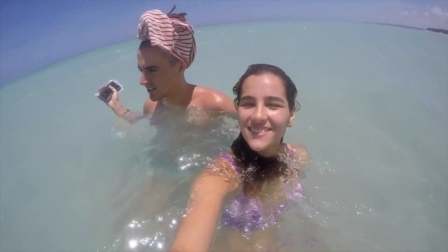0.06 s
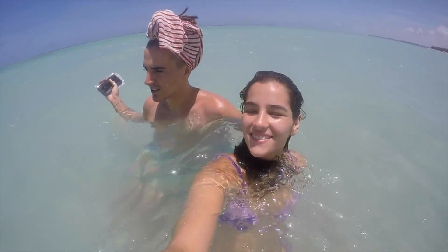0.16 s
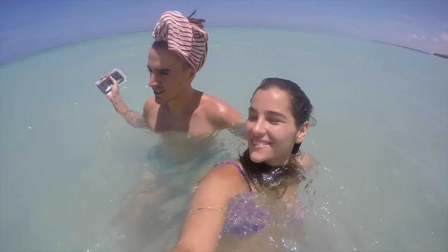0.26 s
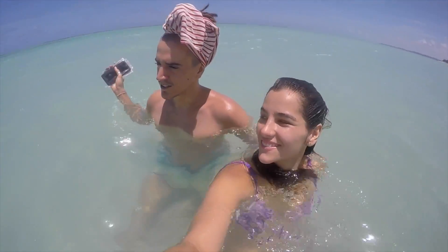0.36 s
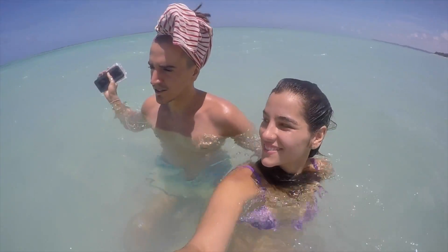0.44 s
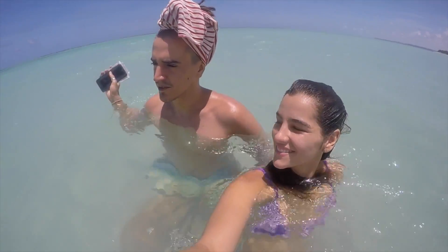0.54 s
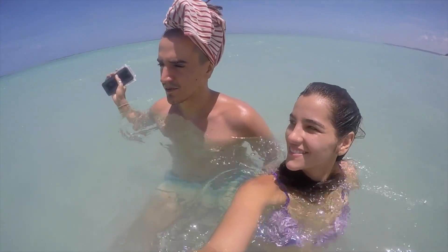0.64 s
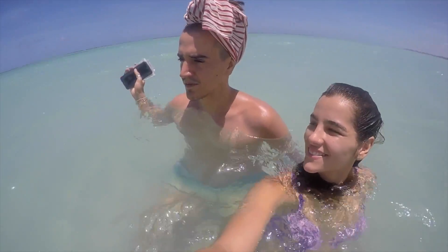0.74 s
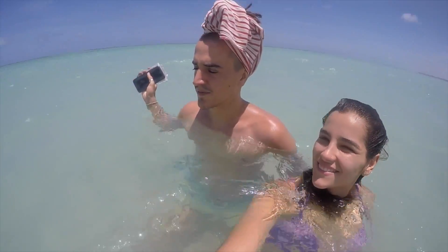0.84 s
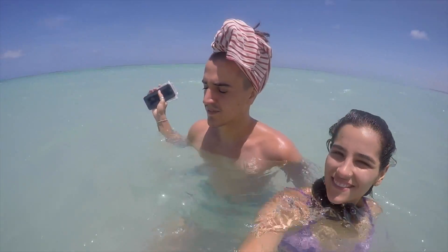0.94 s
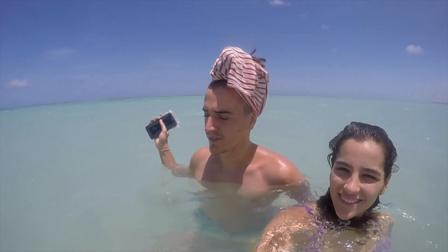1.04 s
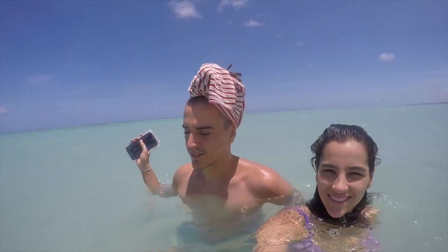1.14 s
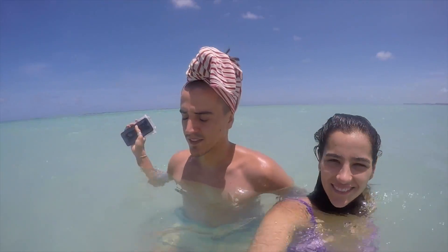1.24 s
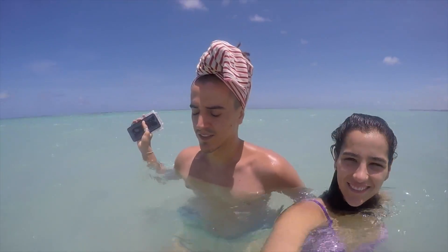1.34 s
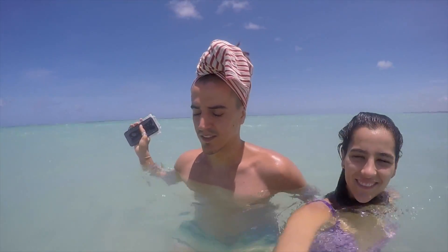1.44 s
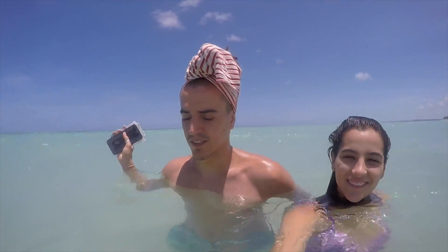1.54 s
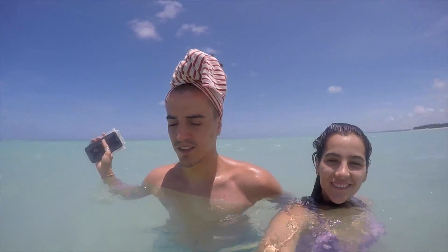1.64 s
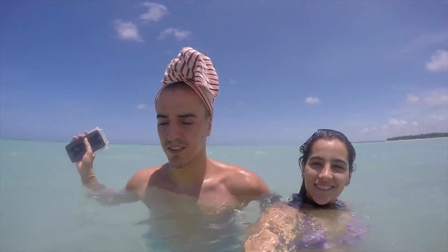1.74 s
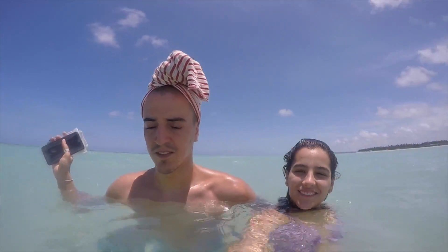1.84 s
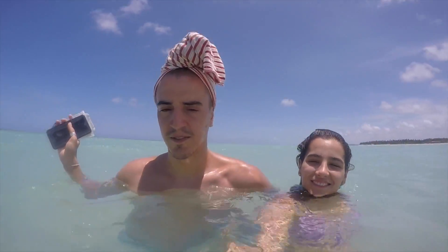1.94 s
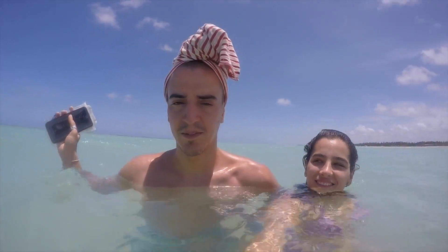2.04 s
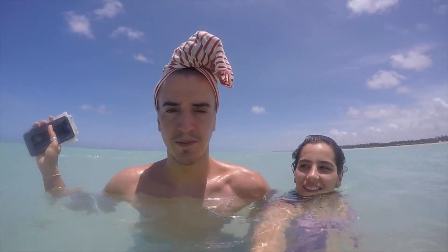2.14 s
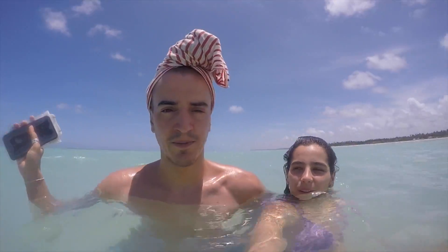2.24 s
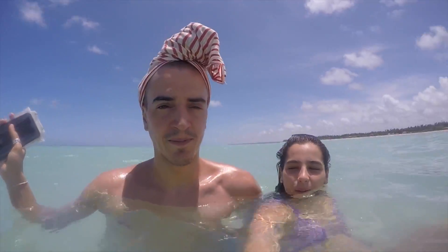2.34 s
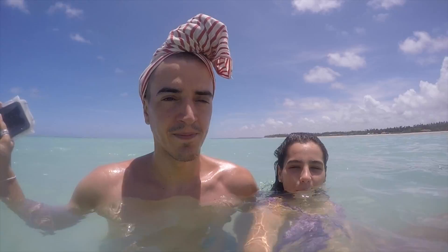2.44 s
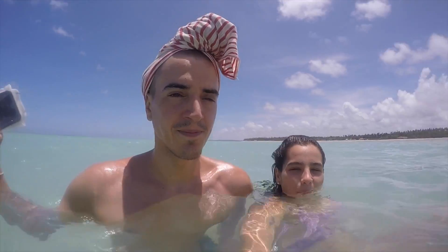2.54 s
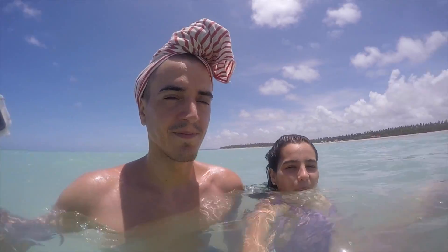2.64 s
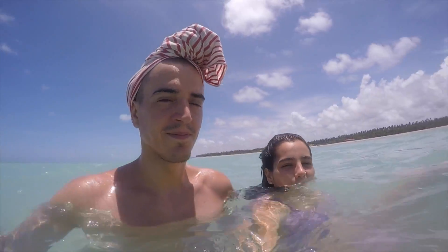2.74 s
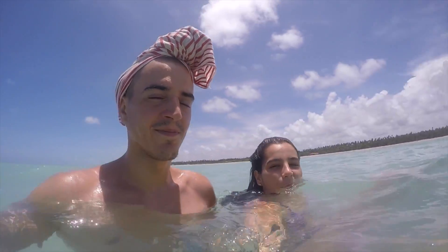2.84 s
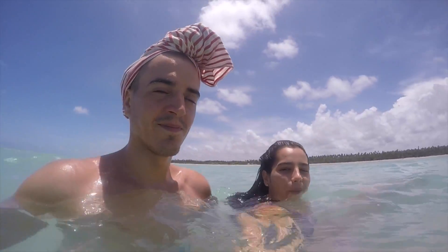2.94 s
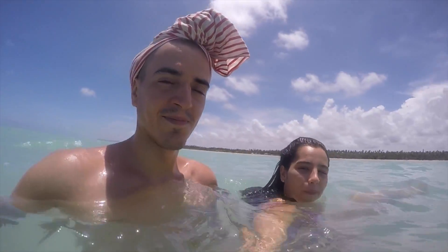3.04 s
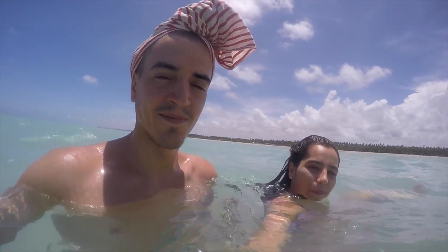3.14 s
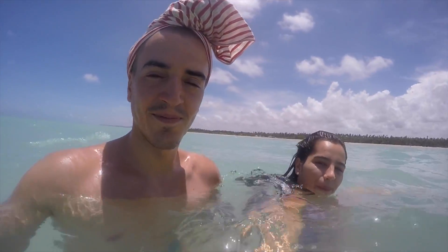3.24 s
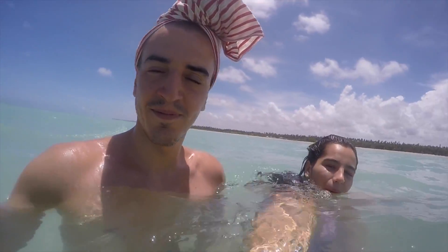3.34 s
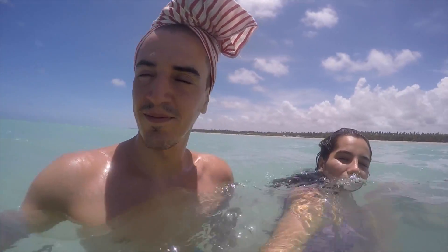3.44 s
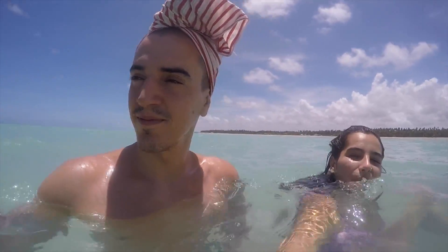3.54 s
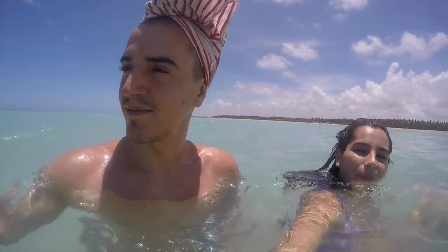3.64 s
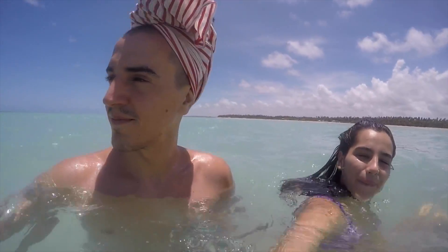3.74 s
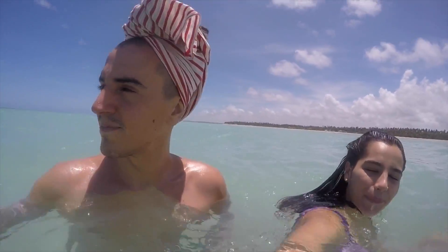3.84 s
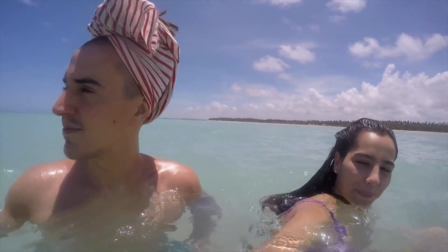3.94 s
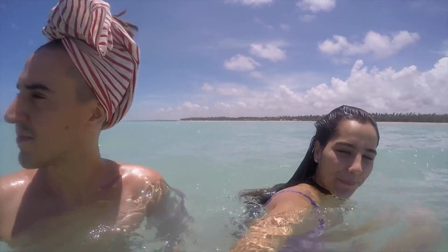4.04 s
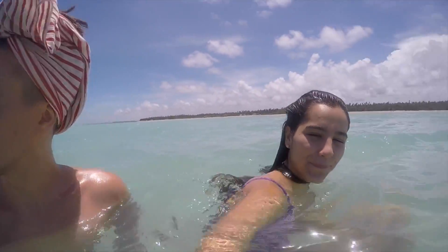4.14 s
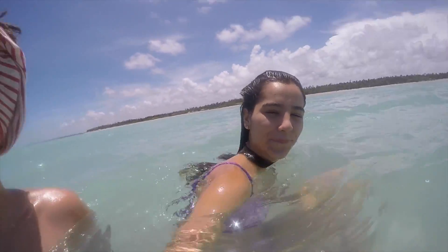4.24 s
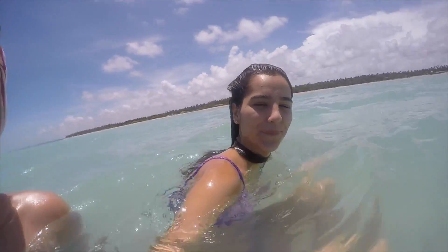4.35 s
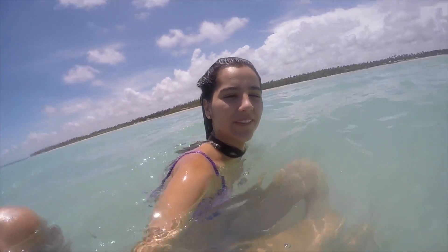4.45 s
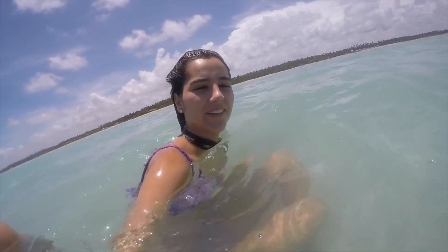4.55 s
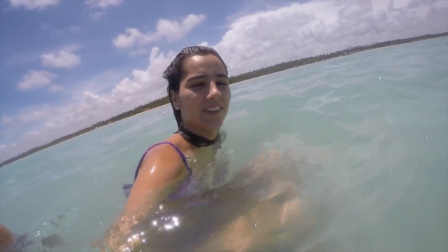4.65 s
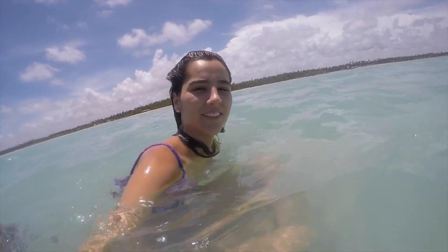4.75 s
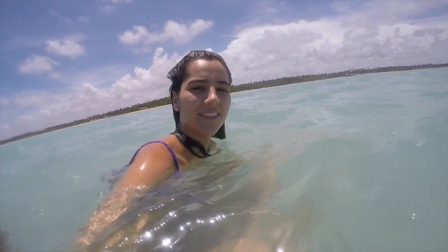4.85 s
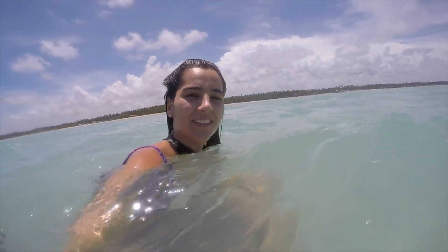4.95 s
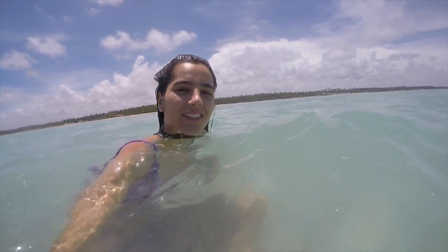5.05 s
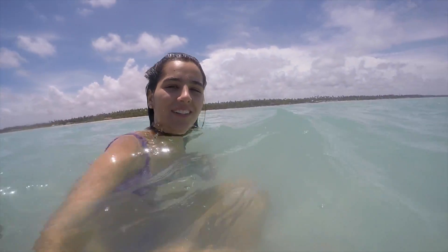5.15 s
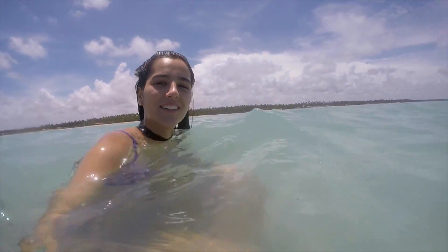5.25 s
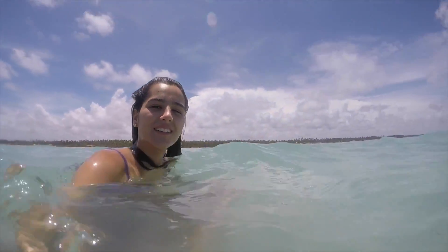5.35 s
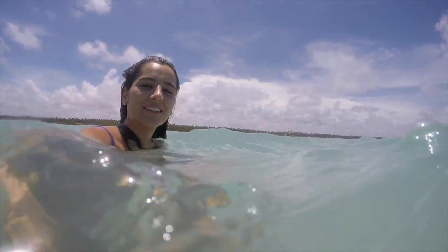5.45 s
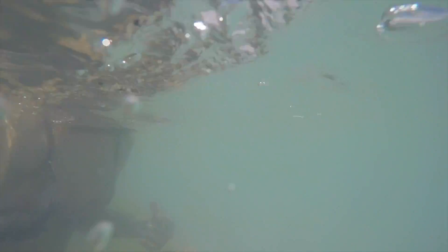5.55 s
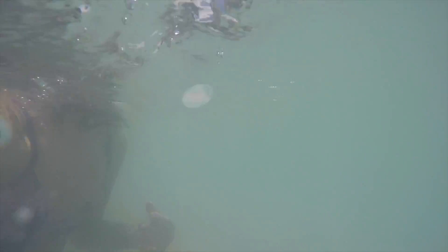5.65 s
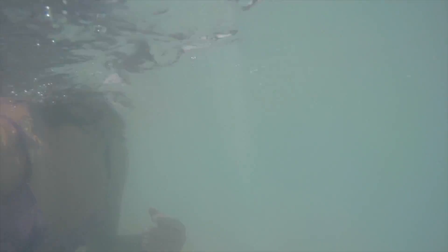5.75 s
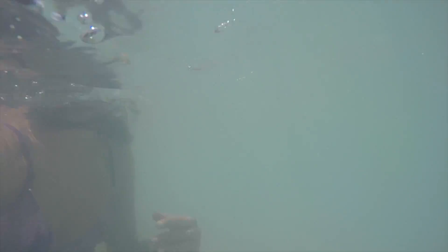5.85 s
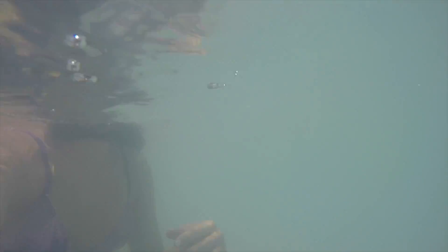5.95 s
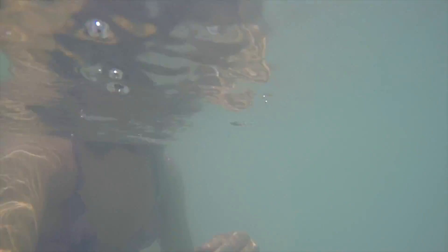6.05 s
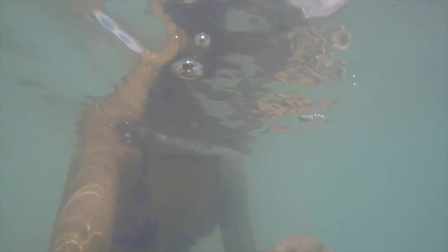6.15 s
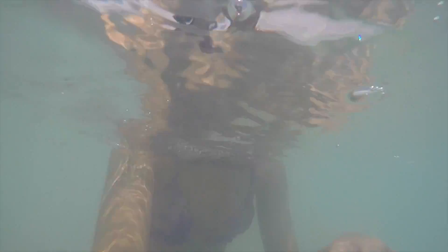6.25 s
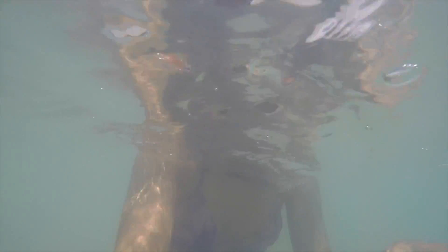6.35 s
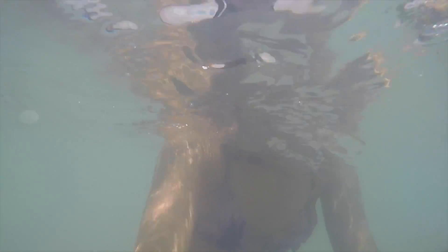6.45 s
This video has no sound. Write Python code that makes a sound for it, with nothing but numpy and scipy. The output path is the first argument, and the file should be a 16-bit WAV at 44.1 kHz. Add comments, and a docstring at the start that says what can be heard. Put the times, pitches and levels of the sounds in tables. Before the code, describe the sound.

Close to the surface of a shallow sea, a deep soft wind rumble lies under faint ripples, tiny drips and bubble plinks. A small wavelet slaps the camera housing near the middle. Late on, the camera is dunked: a loud, dense burst of pops, gurgles, clicks and thumps, then muffled quiet with a few last bubbles.

```python
"""A small camera is held just over shallow sea water: wind rumble, far wash, ripples, drips and bubbles.
The wind and wash are coloured noise, the bubbles dying sines; a short patch of foam fizzes at the start.
Near 3 s a wavelet slaps the housing. Just after 5.3 s the camera is dunked: a burst of pops (sines),
ticks (tiny noise bursts), surges (low noise) and thumps (low swings), then the muffled quiet
under the surface, with a few last bubbles."""
import sys
import numpy as np
from scipy import signal
from scipy.io import wavfile
from scipy.ndimage import uniform_filter1d

SR = 44100
rng = np.random.default_rng(int(sys.argv[2]) if len(sys.argv) > 2 else 0)


def store_pcm(level_fs):
    """Save levels as 16-bit WAV."""
    pcm = np.round(np.clip(level_fs, -1, 1) * 32767).astype(np.int16)
    wavfile.write(sys.argv[1], SR, np.atleast_2d(pcm).T)


def gain_from_db(level_db):
    """Turn a decibel level (scalar or array-like) into a linear amplitude factor."""
    decades = np.asarray(level_db, float) / 20
    return 10 ** decades


N = 286209  # length in samples


def evened(x):
    """Scales to rms 1."""
    return x / np.sqrt(np.mean(x ** 2) + 1e-20)


def add(mix, s, sound):
    """Mixes a sound in at second s."""
    part = mix[round(s * SR):][:len(sound)]
    part += sound[:len(part)]


def band(x, low_hz, high_hz):
    """Band-pass filter."""
    sos = signal.butter(2, [low_hz, min(high_hz, .45 * SR)], "band", fs=SR, output="sos")
    return signal.sosfilt(sos, x)


def noise(spectrum, size, patchy_db):
    """Random short-time spectra with drifting louder and softer patches, at rms 1."""
    hz = np.fft.rfftfreq(size, 1 / SR)
    real, imaginary, patches = rng.standard_normal((4 * N // size + 5, len(hz), 3)).T
    patches = uniform_filter1d(patches, size // 64, 0)  # smooth over pitch, then over time
    patches = evened(uniform_filter1d(patches, 8, 1))
    table_hz, table_db = np.transpose(spectrum)
    colour_db = np.interp(np.log(hz + 1), np.log(table_hz + 1), table_db, left=-90)
    spectra = (real + 1j * imaginary) * gain_from_db(colour_db[:, None] + patchy_db * patches)
    return evened(signal.istft(spectra, nperseg=size, noverlap=3 * size // 4)[1][:N])


def grainy(low_hz, high_hz):
    """Noise in a steep band with a quick flicker, at rms 1."""
    flicker_db, flicker_s = 4, .008
    flicker = evened(uniform_filter1d(rng.standard_normal(N), round(flicker_s * SR)))
    white = rng.standard_normal(N) * gain_from_db(flicker_db * flicker)
    once = band(white, low_hz, high_hz)
    return evened(band(once, low_hz, high_hz))


def swells(rows):
    """One soft-edged swell of level for each row of start, dB and length."""
    out = np.zeros(N)
    for s, db, length_s in rows:
        add(out, s, gain_from_db(db) * signal.windows.tukey(round(length_s * SR), .7))
    return out


def births(per_s, spread_db):
    """Random moments with random sizes; a few are large."""
    sizes = gain_from_db(spread_db * np.minimum(rng.exponential(1, N), 4))
    return sizes * (rng.random(N) < per_s / SR)


def ring(hz, t60, rise, attack):
    """A pulsing air pocket: a dying sine that climbs in pitch (or sinks, if rise is negative)."""
    t = np.arange(round(1.5 * t60 * SR)) / SR
    envelope = (1 - np.exp(-t / attack)) * gain_from_db(-60 * t / t60)  # t60: seconds to fade by 60 dB
    return envelope * np.sin(2 * np.pi * hz * t * (1 + rise * t / (2 * t60)))


# The microphone's own noise. Each row: pitch in Hz, relative strength at that pitch in dB per Hz.
HISS_COLOUR = [(100, 3.5), (700, -5), (2000, -11), (6000, -14.5), (14800, -19.5), (15600, -31.5)]


def self_noise():
    """The steady hiss of the microphone itself."""
    return gain_from_db(-67) * noise(HISS_COLOUR, size=1024, patchy_db=2.5)


# Both rise with the dunking and fall once the camera is under.
# Each row: time in seconds, wind rumble in dB, wash of ripples in dB.
SEA_LEVELS = [(0, -39, -65.5), (.7, -39, -67), (1.2, -40, -66.5), (1.8, -42, -70), (2.5, -42.5, -67),
              (4.6, -42, -66.5), (5.25, -38, -66), (5.6, -32.5, -62), (5.9, -45, -77), (6.49, -48, -72.5)]


def sea_levels():
    """Gains of the rumble and of the wash, gliding from row to row."""
    s, rumble_db, wash_db = np.transpose(SEA_LEVELS)
    t = np.arange(N) / SR
    return gain_from_db(np.interp(t, s, rumble_db)), gain_from_db(np.interp(t, s, wash_db))


# The colour of the wind. Each row: pitch in Hz, relative strength at that pitch in dB per Hz.
RUMBLE_COLOUR = [(5.9, -31), (10, 0.5), (22, 4), (44, -6.5), (108, -21.5), (400, -41), (520, -73.5),
                 (880, -120)]


def wind(level):
    """Wind rumble: very low noise that follows the given level."""
    return level * noise(RUMBLE_COLOUR, size=4096, patchy_db=.5)


# The colour of the far water. Each row: pitch in Hz, relative strength at that pitch in dB per Hz.
WASH_COLOUR = [(150, -18), (500, 0.5), (1000, -2), (1900, -3.5), (2300, 1.5), (2850, -7.5), (5000, -7),
               (9000, -19.5)]


def smooth_wash():
    """Far ripples blended into a smooth noise."""
    return gain_from_db(3.5) * noise(WASH_COLOUR, size=512, patchy_db=1.3)


# Water sliding past: a swish of noise, with random specks of bubbles and random ticks of spray.
# Each row: start in seconds, level in dB, length in seconds.
SLIDING_WATER = [(0, -60, .084), (.91, -65, .05), (1.965, -61, .085), (2.09, -59.5, 0.19),
                 (2.352, -66, 0.17), (2.691, -55, .1), (2.873, -51, .1), (2.988, -51.5, 0.16),
                 (3.071, -41.5, 0.02), (3.117, -51.5, 0.057), (3.175, -61, .1), (3.326, -57.5, .13),
                 (3.6, -64, 0.17), (3.83, -57.5, 0.08), (3.899, -52.5, 0.065), (3.958, -56, 0.098),
                 (4.297, -52, 0.032), (5.316, -32, .27), (5.545, -41, .24), (5.64, -42, .2),
                 (5.731, -26.5, .014)]


def swish_level():
    """How strongly water slides past at each moment."""
    return swells(SLIDING_WATER)


# Water surging around the housing. Each row: start in seconds, level in dB, length in seconds.
SURGING_WATER = [(5.33, -21, .06), (5.42, -26, .06), (5.499, -17, .061)]


def surges():
    """A low roar as water swells around the housing."""
    return swells(SURGING_WATER) * grainy(35, 178)


# A patch of foam bursting close by. Each row: start in seconds, level in dB, length in seconds.
FOAM_PATCH = [(0, -54.5, .08)]


def fizz():
    """Bursting foam, as a short swell of higher noise."""
    return swells(FOAM_PATCH) * grainy(1900, 4800)


def tiny_bubbles(swish):
    """Random small rings: a thin swarm all the time, and specks that come with the swishes."""
    port_hz, swarm_per_s, specks_per_s = 2300, 200, 350
    swarm, specks = np.zeros((2, N))
    kinds = rng.random((30, 3))
    for place, cycles, rise in kinds:
        # most gather at the resonance of the microphone port
        hz = port_hz * 2.6 ** (2 * place - 1) ** 5
        bubble = ring(hz, (10 + 30 * cycles ** 3) / hz, .6 * rise, 0.00048)
        swarm_births = births(swarm_per_s / len(kinds), spread_db=3)
        speck_births = swish * births(specks_per_s / len(kinds), spread_db=4)
        swarm += signal.oaconvolve(swarm_births, bubble)[:N]
        specks += signal.oaconvolve(speck_births, bubble)[:N]
    return gain_from_db(-4) * evened(swarm), specks


def ripples(level, swish):
    """Smooth wash with a thin swarm of bubbles; swishes add flickering noise and more bubbles."""
    swarm, specks = tiny_bubbles(swish)
    moving = swish * grainy(547, 2800) + surges() + fizz()
    return moving + specks + level * (smooth_wash() + swarm)


# Water shoving the housing. Each row: start in seconds, level in dB, starting pitch in Hz.
SHOVES = [(5.326, -13, 43.3), (5.349, 1.5, 288), (5.52, -5, 39.7), (5.676, -9, 60)]


def thumps():
    """Each shove is a few swings of pressure that slow down and die fast."""
    out = np.zeros(N)
    for s, db, hz in SHOVES:
        add(out, s, gain_from_db(db) * ring(hz, 3.5 / hz, -0.44, 0.00095))
    return out


# Water snapping shut on the microphone port.
# Each row: start in seconds, level in dB, treble band against body band in dB before their own gains.
PORT_SNAPS = [(1.0688, -47.5, -20), (2.094, -46, -19), (3.0142, -40, -21), (3.091, -28.5, -12),
              (3.0948, -21.5, -18.5), (3.085, -42, -4), (3.2991, -50, -23), (3.3365, -49, -16),
              (3.522, -53.5, 3), (3.969, -50.5, -3.5), (5.3208, -28.5, -5), (5.3346, -39, -2),
              (5.365, -32.5, -17.5), (5.3726, -22, -5.5), (5.399, -15, -20.5), (5.4075, -31.5, -33.5),
              (5.4381, -36.5, -8.5), (5.4437, -13.5, -6), (5.4502, -16.5, -33), (5.4654, -27.5, -31),
              (5.4924, -27, -22), (5.4967, -17.5, -18), (5.5036, -15, -7.5), (5.5192, -13, -11),
              (5.5237, -21, -3), (5.5302, -21, -33), (5.5483, -13, -31), (5.5525, -25.5, -27.5),
              (5.5629, -25.5, -15), (5.6066, -18.5, -2.5), (5.617, -29, -4), (5.644, -28, 0),
              (5.6514, -32, -12), (5.6588, -13.5, -1), (5.6666, -10, -8), (5.6793, -20.5, -19),
              (5.6959, -27, -34), (5.7008, -34, -8.5), (5.77, -36, 8), (5.7721, -27, 2.5),
              (5.7956, -29.5, -2)]


def ticks(swish):
    """Millisecond bursts of noise in a body and a treble band; spray thrown on the port adds random ones."""
    dull = gain_from_db(-5) * swish * births(per_s=90, spread_db=3.5)
    sharp = dull * gain_from_db(-12 + 6 * rng.standard_normal(N))
    for s, db, bright_db in PORT_SNAPS:
        add(dull, s, gain_from_db(np.array([db])))
        add(sharp, s, gain_from_db(np.array([db + bright_db])))
    t = np.arange(600) / SR
    shape = gain_from_db(-60 * t / .006) * (1 - np.exp(-t / .0006)) ** 2
    envelopes = signal.oaconvolve([dull, sharp], shape[None], axes=1)[:, :N]
    body, treble = rng.standard_normal((2, N)) * envelopes
    treble = band(band(treble, 10000, 17000), 8000, 15500)
    return gain_from_db(17.5) * band(body, 3000, 7600) + gain_from_db(14.0) * treble


# Short pops of trapped air.
# Each row: start in seconds, level in dB, starting pitch in Hz, time to fade by 60 dB in seconds.
AIR_POPS = [(.0666, -34, 4930, 0.008), (.1514, -47.5, 2260, .037), (.201, -48.5, 2470, .025),
            (.2354, -41.5, 3450, .011), (.3037, -39.5, 2330, 0.031), (.3751, -47.5, 1210, .046),
            (.497, -45, 1390, .05), (0.5053, -41.5, 2290, .021), (.575, -48, 2150, .03),
            (.7079, -49, 5160, .02), (.813, -27.5, 665, 0.0025), (.836, -38, 600, .003),
            (.8672, -32, 960, 0.0045), (1.0684, -40.5, 6700, .0053), (1.072, -42.5, 2350, .021),
            (1.58, -49, 2430, .037), (1.866, -47.5, 4700, .0089), (2.0474, -47, 1250, .054),
            (2.0704, -36.5, 2280, .006), (2.0924, -36.5, 1870, 0.016), (2.134, -40, 3300, .01),
            (2.163, -45, 3550, .021), (2.137, -40, 1450, .046), (2.145, -40, 1050, .032),
            (2.177, -37, 2120, 0.029), (2.3029, -43.5, 3760, .013), (2.9613, -20.5, 635, 0.048),
            (2.9663, -8, 2300, 0.005), (2.965, -14, 2000, .017), (2.9908, -13.5, 2160, 0.0034),
            (2.9895, -10, 3720, .009), (3.0264, -31, 2130, .013), (3.0765, -31, 7260, 0.0075),
            (3.091, -7.5, 1014, 0.0088), (3.0906, 3.5, 2517, .016), (3.114, -37, 2770, .037),
            (3.1528, -39, 4480, .008), (3.2923, -43, 1690, .045), (3.337, -28.5, 2560, .03),
            (3.3745, -35.5, 2750, 0.0069), (3.484, -42, 4450, 0.0082), (3.7219, -39, 1790, 0.0088),
            (3.382, -42, 2340, .045), (3.9705, -37.5, 2330, .013), (3.9294, -37, 1110, .023),
            (4.2296, -38, 890, .0056), (4.2825, -38, 890, .0072), (4.3091, -40, 1820, 0.053),
            (4.376, -22, 5270, 0.0027), (4.378, -31.5, 3920, 0.0086), (4.4067, -31.5, 900, 0.0047),
            (4.4147, -38, 2325, .017), (4.8573, -29, 1940, 0.0053), (4.9346, -45.5, 3680, .022),
            (4.968, -46.5, 1340, 0.056), (5.1835, -41, 3580, .011), (5.262, -29, 900, 0.0091),
            (5.269, -23, 700, .012), (5.272, -26.5, 1870, 0.0096), (5.323, 9, 1860, 0.0036),
            (5.324, -10.5, 1210, .018), (5.323, -12.5, 702, .035), (5.3246, -3.5, 2340, .019),
            (5.341, -6.5, 2760, 0.0085), (5.3511, 5, 666, .0073), (5.361, 8, 1160, 0.035),
            (5.3607, -7, 927, .059), (5.366, -12, 5900, .008), (5.371, 11, 2316, .017),
            (5.38, 2, 1720, .0064), (5.3829, -4, 1810, .018), (5.3922, 1, 2000, .01),
            (5.397, -2.5, 1890, .019), (5.4002, -5, 1250, 0.016), (5.42, -4, 2300, 0.011),
            (5.422, -.5, 1240, .0044), (5.436, -1, 1200, .022), (5.4433, 4, 5500, 0.0065),
            (5.4433, 18.5, 1980, 0.0051), (5.4478, 6.5, 1610, 0.011), (5.4497, 4.5, 2120, .008),
            (5.4588, -3, 1114, .02), (5.4671, 10.5, 1171, .02), (5.468, 5, 1780, 0.007),
            (5.479, -3.5, 1116, .025), (5.4792, 0, 2098, .041), (5.4799, 5, 2870, .008),
            (5.4932, 3, 2090, .008), (5.4971, -3.5, 5495, .0062), (5.5037, 6.5, 5640, 0.0044),
            (5.506, 9.5, 1226, 0.012), (5.512, 8.5, 1760, .015), (5.5126, 2.5, 2340, 0.024),
            (5.514, 3.5, 670, 0.018), (5.5235, -7.5, 4330, .01), (5.5284, -7, 6400, 0.0069),
            (5.5465, -3, 7030, .009), (5.5558, -0.5, 3700, 0.0022), (5.5798, -2.5, 1730, 0.0047),
            (5.606, -13.5, 2340, 0.016), (5.6377, 11, 990, 0.0083), (5.6405, -4.5, 715, 0.045),
            (5.6693, 3.5, 4150, .011), (5.675, -5, 2830, 0.0092), (5.6764, 0, 394, .031),
            (5.688, 0, 1443, .037), (5.6933, -2, 813, .022), (5.69, -11, 2800, .021),
            (5.7, -22.5, 1950, .08), (5.7175, -23, 810, .059), (5.739, -6, 1145, 0.028),
            (5.7409, -2, 2710, 0.014), (5.7425, -1.5, 1705, .013), (5.765, -14, 2150, .0094),
            (5.7738, -9, 2220, 0.017), (5.7893, 10, 2066, 0.0061), (5.799, -15, 737, 0.022),
            (5.79, -8, 1100, .015), (5.8076, -33, 720, .086), (5.8098, -25, 1534, .014),
            (5.8364, -31.5, 2230, .02), (5.8365, -29, 2760, .0086), (5.825, -39, 905, .15),
            (5.8524, -29.5, 4720, 0.02), (5.9048, -41.5, 1894, 0.042), (5.9363, -52, 1246, 0.095),
            (6.1039, -42.5, 1617, 0.042), (6.3611, -52.5, 749, .1)]
# Bubbles that climb in pitch as they reach the surface. Each row: start in seconds, level in dB,
# starting pitch in Hz, time to fade by 60 dB in seconds, rise in pitch over that time as a share.
RISING_BUBBLES = [(0.068, -39, 1320, 0.052, 0.8), (0.53, -41, 1500, 0.046, 0.46),
                  (1.275, -50, 1400, 0.06, 1.2), (2.152, -38, 880, 0.06, 2.3), (2.174, -41, 1036, 0.07, 1),
                  (2.7645, -35, 916, 0.029, 0.31), (2.82, -39.5, 950, 0.13, 3.5),
                  (3.0905, -22.5, 2065, 0.048, 0.36), (3.4422, -31, 1330, 0.046, 0.23),
                  (4.324, -44, 1790, 0.05, 0.53), (4.3275, -40, 1327, 0.043, 0.56),
                  (4.766, -41, 1450.0, 0.058, 0.71), (4.86, -32, 850, 0.039, 1.46),
                  (5.0148, -34, 2280, 0.028, 0.5)]


def pops_and_chirps():
    """Each air pocket is one dying sine, all thinned below 260 Hz."""
    pops = np.zeros(N)
    for s, db, hz, t60 in AIR_POPS:
        add(pops, s, gain_from_db(db) * ring(hz, t60, .06, .026 * t60))
    for s, db, hz, t60, rise in RISING_BUBBLES:
        add(pops, s, gain_from_db(db) * ring(hz, t60, rise, 0.35 * t60))
    return band(pops, 260, SR / 2)


def froth_of(pops):
    """Pops stir up a short froth of noise, the big ones more than their share."""
    fade = gain_from_db(-60 / (.022 * SR))  # falls 60 dB in 22 ms
    stir = signal.lfilter([1], [1, -fade], abs(pops) ** 1.35) / (0.012 * SR)
    foam = rng.standard_normal(N)
    for _ in range(3):
        foam = band(foam, 350, 3300)
    return gain_from_db(4.0) * stir * evened(foam)


# Air held under the housing.
# Each row: pitch in Hz, relative level in dB, time to fade by 60 dB in seconds.
AIR_POCKET = [(896, -24, 0.13), (2000, -18.5, 0.038), (2800, -25.5, 0.041)]


def air_pocket(sound):
    """The held air rings along: at a quarter above the surface, fully once under it."""
    submerged_s = 5.63
    pocket = sum(gain_from_db(db) * ring(hz, t60, 0, 0.00016)[:2500] for hz, db, t60 in AIR_POCKET) / 15
    filled = np.clip((np.arange(N) / SR - submerged_s) * 20 + 1, .25, 1)
    wobble = 1 + .7 * evened(uniform_filter1d(rng.standard_normal(N), 160))
    return wobble * signal.oaconvolve(sound * filled, pocket)[:N]


def bubbles():
    """Pops and rising bubbles with the froth they throw and the held air they set ringing."""
    pops = pops_and_chirps()
    froth = froth_of(pops)
    return pops + froth + air_pocket(pops + 2 * froth)


def scene():
    """Wind and water around the camera, as one channel."""
    rumble_level, wash_level = sea_levels()
    swish = swish_level()
    water = ripples(wash_level, swish) + thumps() + ticks(swish) + bubbles()
    return (wind(rumble_level) + water)[None]


def gain_control(loud):
    """Slow turn-down of loud stretches: a lone click hardly moves it, the dunking pulls it down."""
    keep = np.exp(-1 / (.12 * SR))  # averages power over about 0.12 s
    power = signal.lfilter([1 - keep], [1, -keep], loud[0] ** 2)
    power_db = 10 * np.log10(power + 1e-12)
    fall_db = np.arange(N) * 18. / SR  # the held level sinks by at most 18 dB per second
    held_db = np.maximum.accumulate(power_db + fall_db) - fall_db
    over_db = np.maximum(held_db + 23, 0)  # excess over -23 dB
    return loud / gain_from_db(0.62 * uniform_filter1d(over_db, 1500))


def overload(loud):
    """Rounds off peaks near full scale."""
    full_scale = .9
    return loud / (1 + abs(loud / full_scale) ** 6) ** (1 / 6)


def roll_off(x):
    """The treble ends steeply here."""
    return signal.sosfilt(signal.butter(12, 16660, fs=SR, output="sos"), x)


def record(dry):
    """Adds self-noise, then slow gain control, overload and a steep treble cut at 15.8 kHz."""
    loud = overload(gain_control(dry + self_noise()))
    treble_cut = signal.butter(10, 15800, fs=SR, output="sos")
    return roll_off(signal.sosfilt(treble_cut, loud))


dry = scene()
out = record(dry)
store_pcm(out)
```